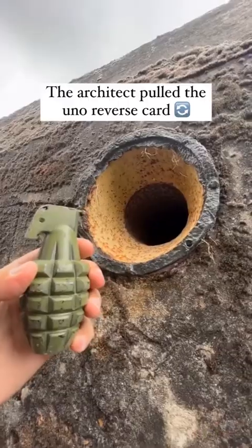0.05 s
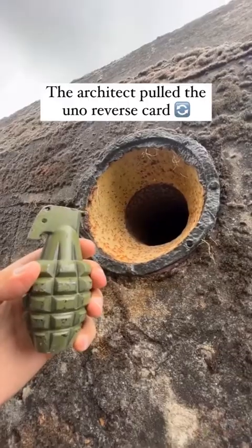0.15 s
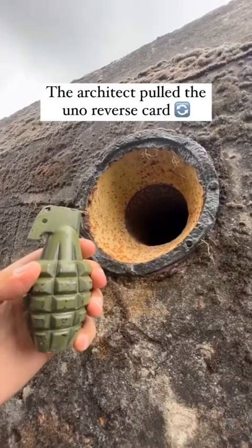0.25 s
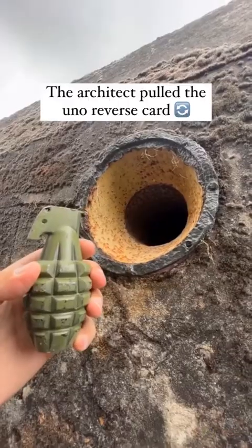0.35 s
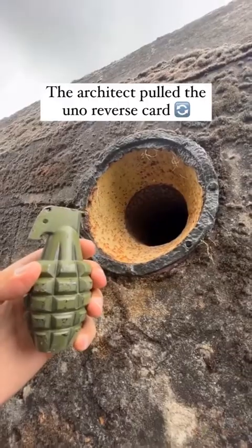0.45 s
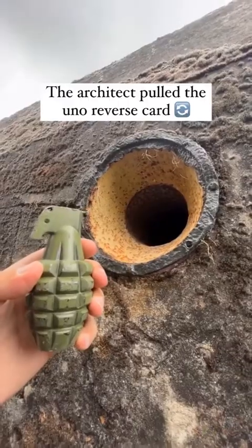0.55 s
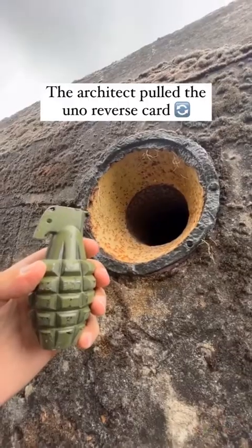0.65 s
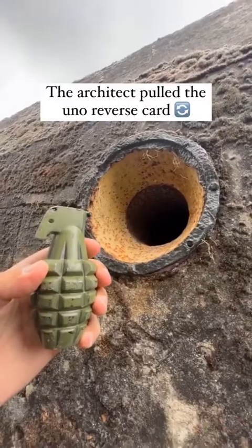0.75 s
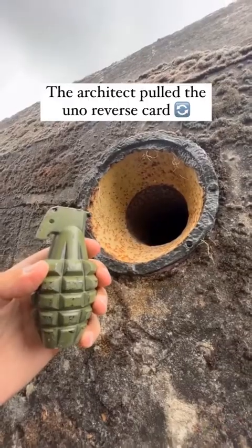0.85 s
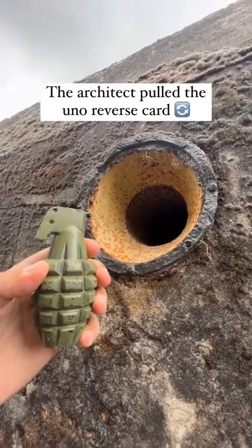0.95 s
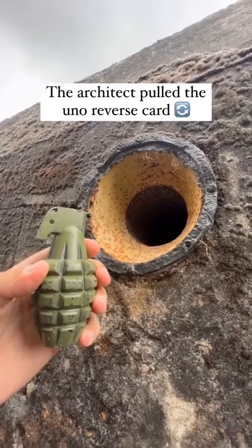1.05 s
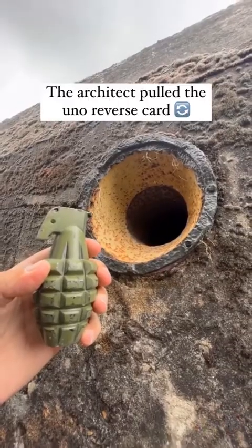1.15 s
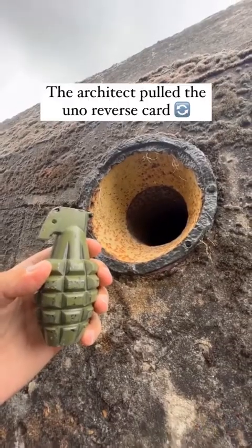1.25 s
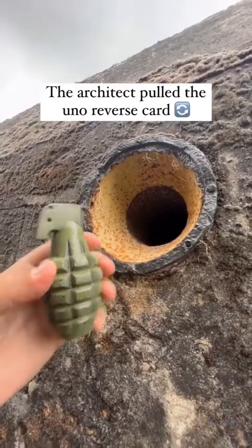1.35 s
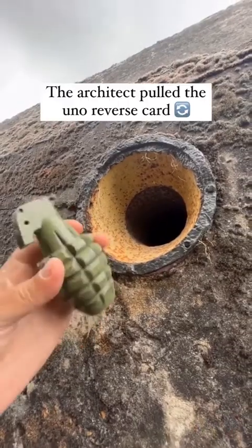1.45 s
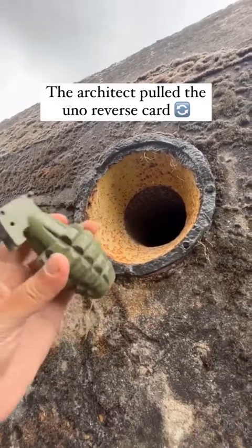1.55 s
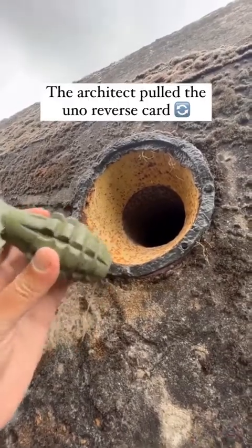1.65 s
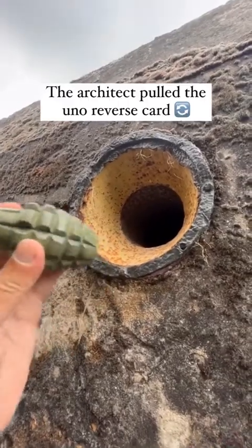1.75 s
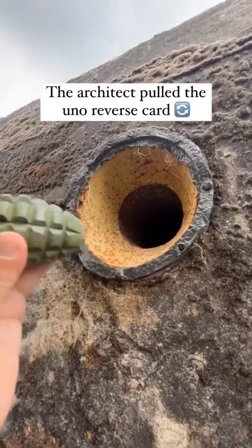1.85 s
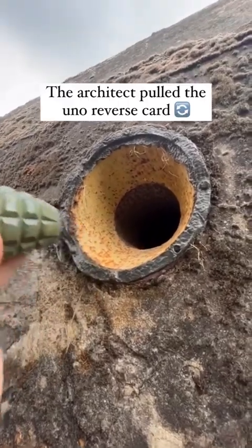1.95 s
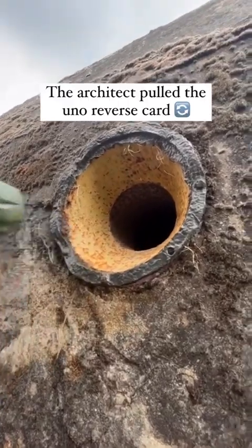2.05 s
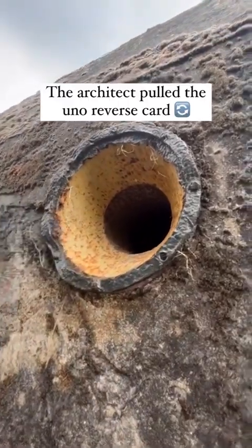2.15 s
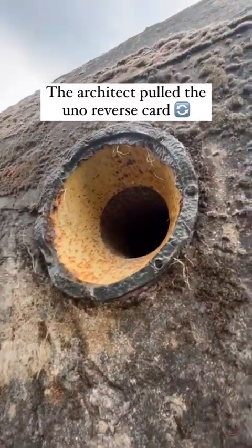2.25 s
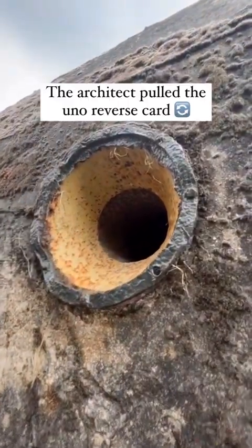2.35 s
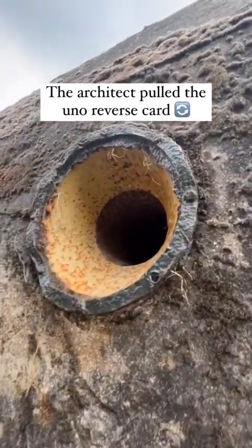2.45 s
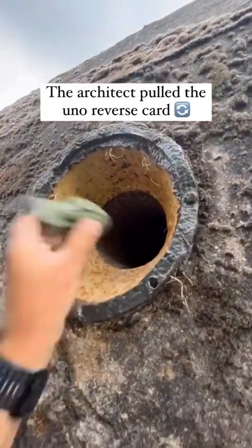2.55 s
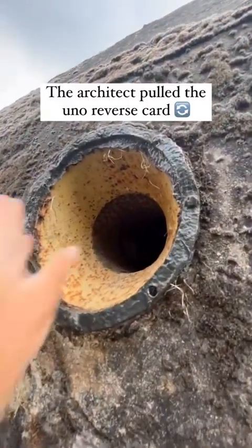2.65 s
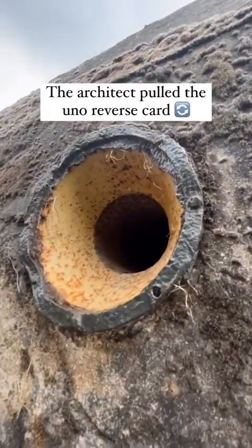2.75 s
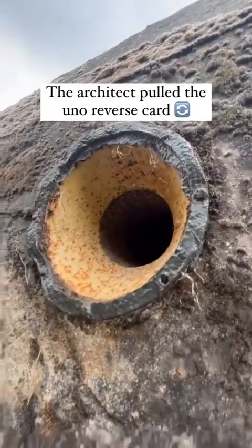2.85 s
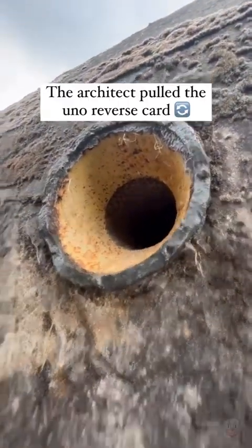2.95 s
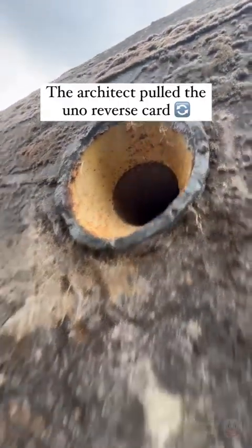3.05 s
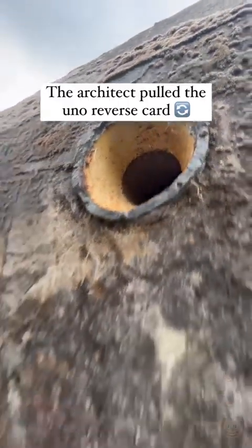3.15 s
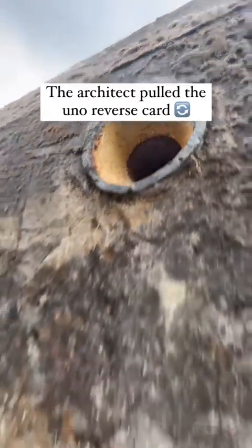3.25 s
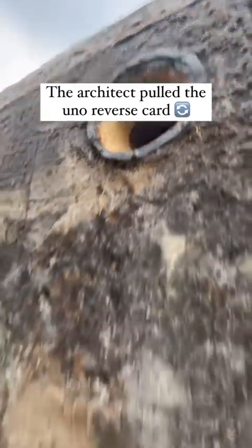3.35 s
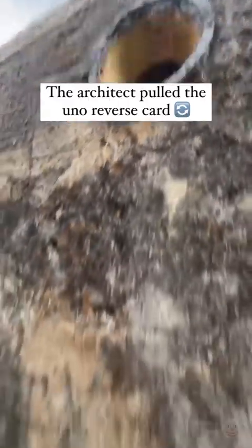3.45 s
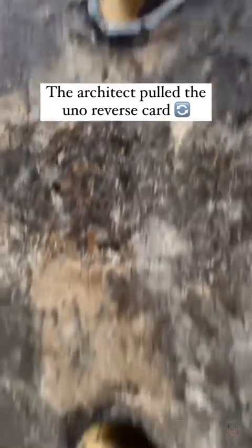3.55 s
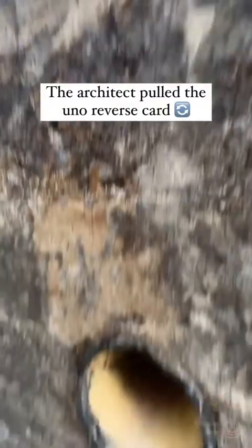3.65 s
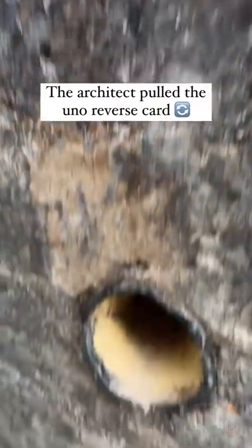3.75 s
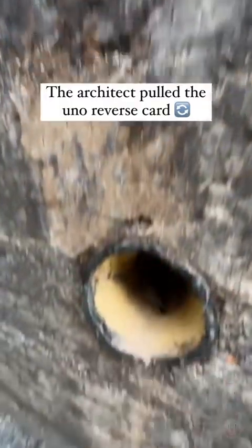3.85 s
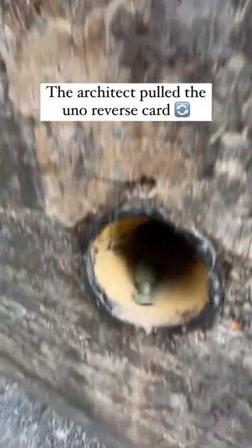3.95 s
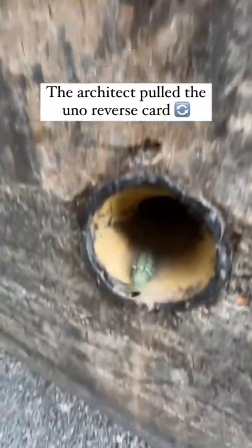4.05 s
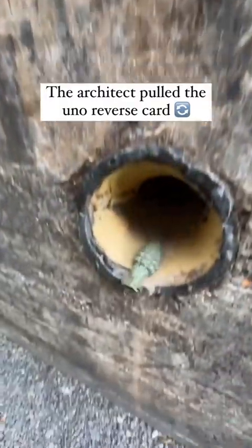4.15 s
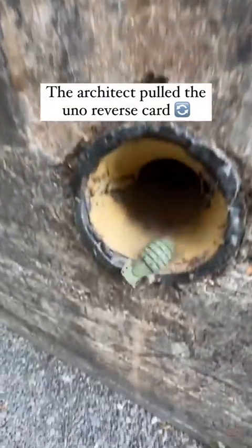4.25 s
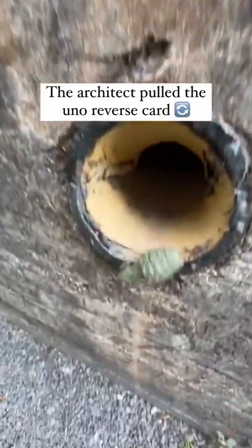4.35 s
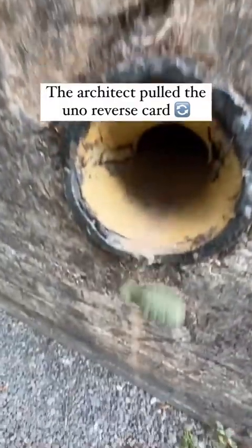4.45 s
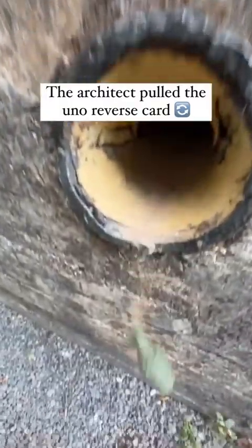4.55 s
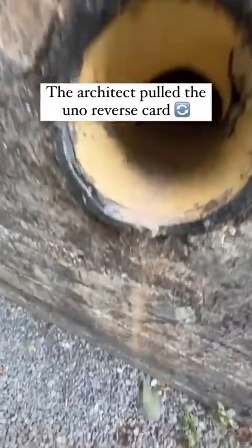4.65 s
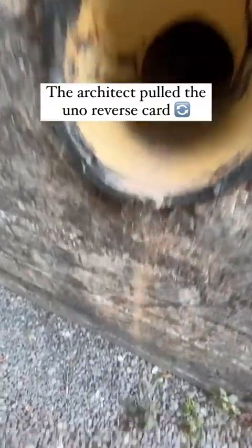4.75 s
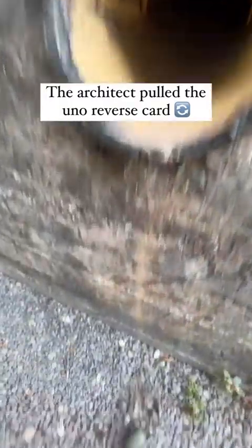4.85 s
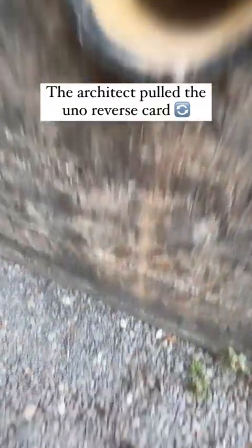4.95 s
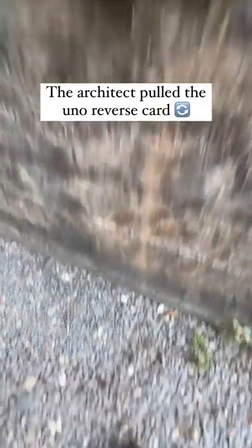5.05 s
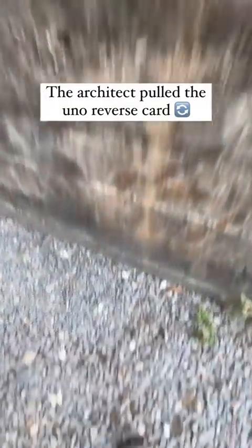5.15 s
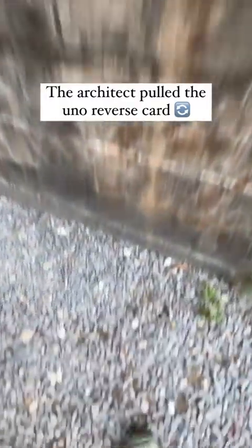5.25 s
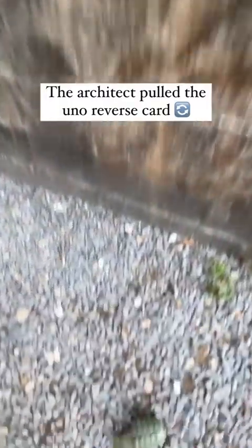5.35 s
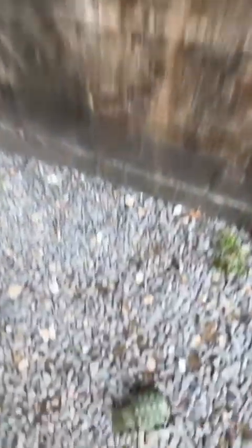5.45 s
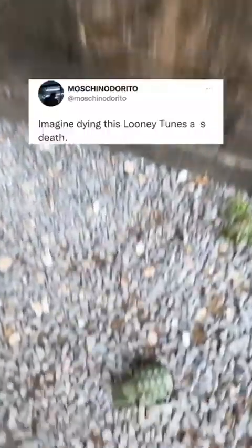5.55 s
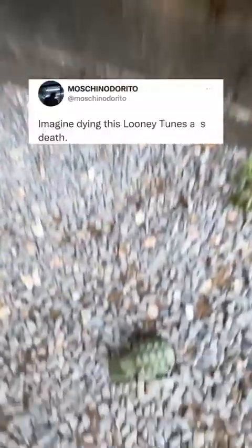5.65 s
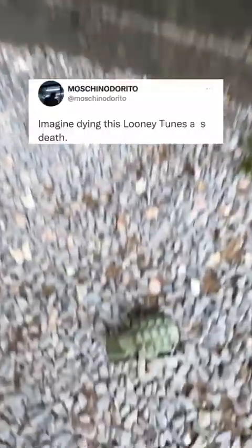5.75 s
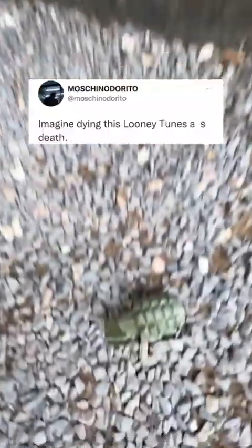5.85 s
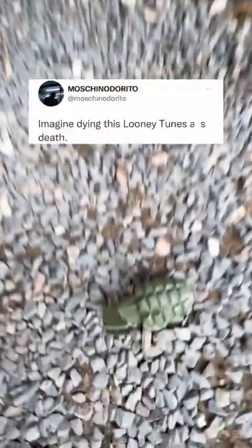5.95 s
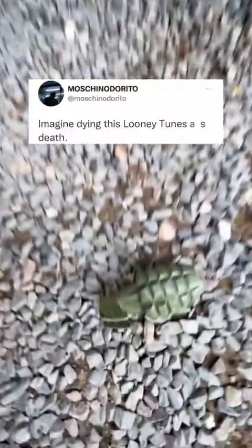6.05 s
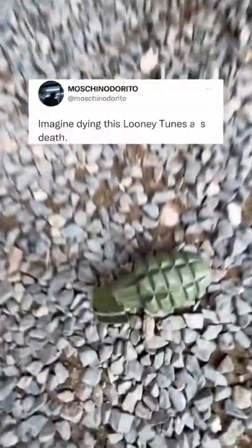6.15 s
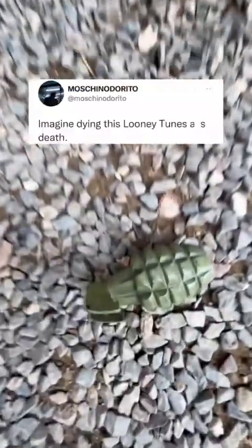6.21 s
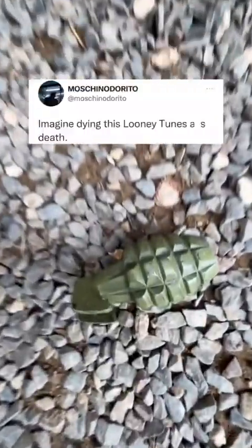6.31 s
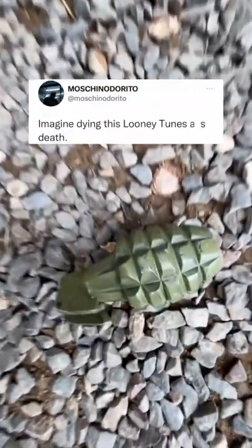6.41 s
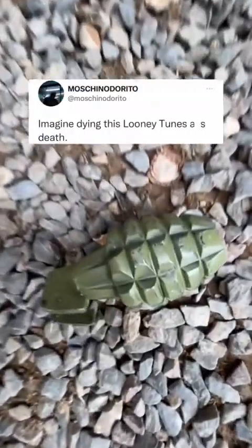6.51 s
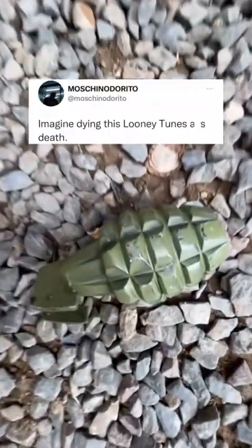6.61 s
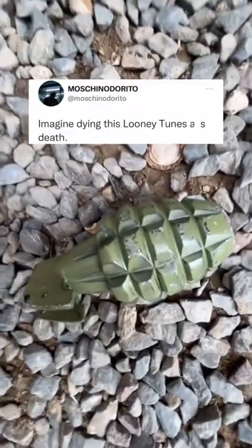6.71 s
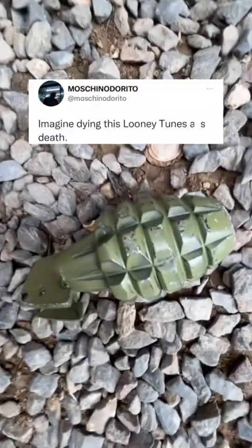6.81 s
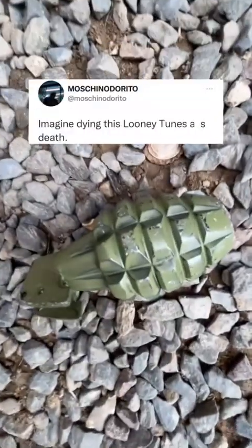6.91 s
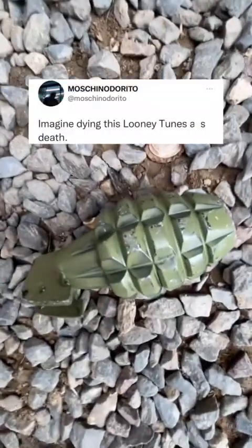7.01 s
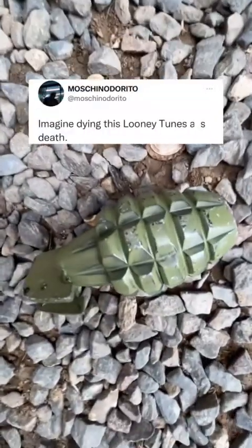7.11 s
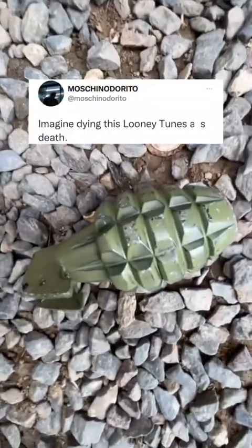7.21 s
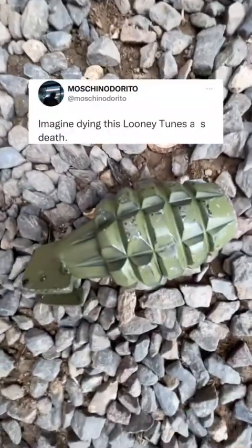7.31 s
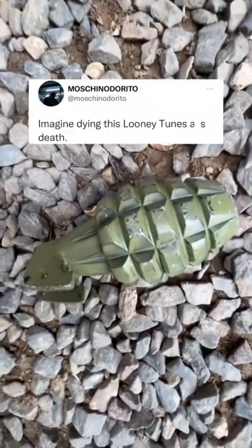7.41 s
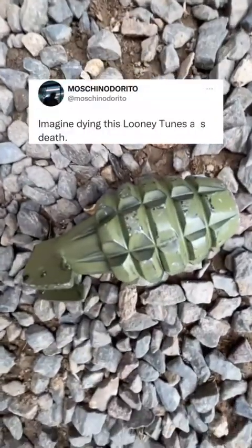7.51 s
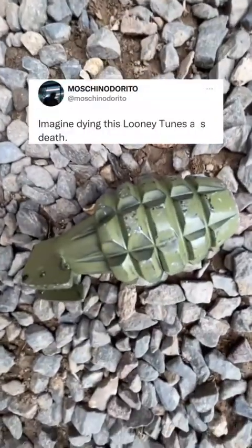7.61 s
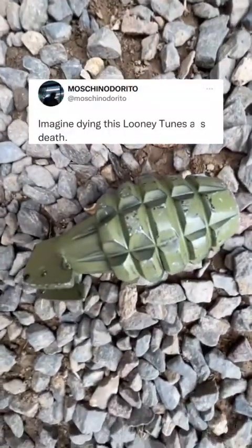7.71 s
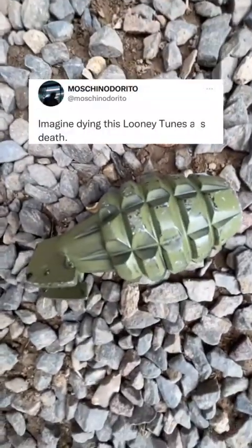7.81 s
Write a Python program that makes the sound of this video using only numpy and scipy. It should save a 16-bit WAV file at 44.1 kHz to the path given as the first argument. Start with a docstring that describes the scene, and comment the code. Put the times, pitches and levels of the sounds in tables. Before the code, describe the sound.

Close outdoor recording with low wind on the microphone. An iron casting is turned in the hand with faint ticks and dull taps, then thrown into a pipe: a hard bang, dense clanging knocks, gritty sliding and thin high ringing. The knocks weaken over a low boom, a brief gap follows, then a sharp crunching landing on gravel, quick small bounces, and only soft wind and quiet air remain.

```python
"""Outdoors, at a concrete wall with a pipe that opens above gravel: a hollow iron casting is turned in the hand,
thrown into the pipe, bangs and slides down it, drops out of the lower mouth and bounces to rest.
Blows are noise knocks and cracks over decaying sine modes; friction is shaped noise that makes the iron sing.
Wind is resonant low noise under a gust curve; quiet coloured air, a pipe boom and a far hum lie beneath."""
import sys
import numpy as np
from scipy import signal
from scipy.fft import rfft, irfft, next_fast_len
from scipy.io import wavfile

SR = 44100
rng = np.random.default_rng(int(sys.argv[2]) if len(sys.argv) > 2 else 0)


def dump(signal):
    """Clip the signal to [-1, 1] and save it as 16-bit WAV at the path in sys.argv[1]."""
    limited = np.clip(np.atleast_2d(signal).T, -1, 1)
    pcm = np.round(limited * 32767).astype(np.int16)
    wavfile.write(sys.argv[1], SR, pcm)


N = 347194

# Far outdoor air: (pitch_hz, density_db)
AIR_SPECTRUM = [(59, -23.5), (100, -6), (161, -6), (220, -12.5), (313, -13.5), (354, -13.5), (525, -13),
                (571, -21.5), (646, -20), (1480, -28), (1790, -35), (3610, -37.5), (14200, -52)]
AIR_DB = -63
# Wind on the microphone before and after the pipe boom, each: (start_s, level_db)
WIND_SPELLS = [
    [(0.0, -48.5), (0.76, -68), (0.89, -53.5), (0.95, -63), (1.67, -63), (2.01, -46), (2.08, -63),
     (2.15, -38), (2.39, -49.5), (3.09, -53), (3.22, -37), (3.38, -50.5), (3.8, -32.5)],
    [(4.76, -37.5), (4.92, -40), (5.34, -43.5), (5.48, -27), (5.63, -45.5), (5.69, -34.5), (5.74, -53.5),
     (5.91, -37.5), (5.94, -51), (6.47, -47), (6.8, -56.5), (7.37, -46), (7.87, -50)],
]
# Soft resonances of the wind: (pitch_hz, width_hz per filter pass, level_db)
WIND_MODES = [(48.5, 15, -5.5), (63, 31, 3), (118, 60, -11.5)]
UNDER_BOOM_DB = -55   # wind level assumed under the pipe boom
BUFFET_DB, BUFFET_RATE_HZ = 3, 3   # random buffeting: spread and fastest rate

# Ribbed iron over fingers, pipe wall and stones: (start_s, length_s, level_db, favoured_pitch_hz, singing_db)
SLIDE_STROKES = [(1.359, 0.084, -68, 6400, 4), (1.515, 0.2, -87, 6000, 37), (1.568, 0.18, -76, 2600, 6),
                 (1.67, 0.16, -83, 4730, 23), (1.769, 0.21, -75, 7050, 25), (1.82, 0.069, -70.5, 2090, 5),
                 (1.958, 0.094, -76, 1450, 0), (2.096, 0.1, -67.5, 7500, 37.5),
                 (2.27, 0.098, -75.5, 7240, 22), (2.433, 0.089, -69, 4930, 20),
                 (2.528, 0.08, -60.5, 6360, 10), (3.235, 0.1, -29.5, 4200, 5.5),
                 (3.238, 0.068, -22, 6400, 11), (4.792, 0.059, -23.5, 6500, 27),
                 (4.848, 0.093, -46, 10770, 24.5), (5.098, 0.13, -54, 9600, 0),
                 (5.265, 0.026, -45.5, 11270, 2), (5.496, 0.04, -54.5, 6360, 19.5)]
# Hiss of those strokes: (pitch_hz, density_db)
SLIDE_SPECTRUM = [(1470, -13.5), (2500, -4), (5210, -17.5), (6970, -15.5), (12400, -2), (13200, -8),
                  (14200, -32.5)]
# Small taps in the hand: (start_s, level_db, colour_hz)
HAND_TAPS = [(1.596, -48, 1950), (1.662, -54.5, 1820), (2.04, -61, 1480), (2.133, -47, 1940),
             (2.22, -44.5, 740), (2.273, -34.5, 600), (2.444, -39, 530), (2.499, -38.5, 590),
             (2.569, -31.5, 553)]
# Rustle of the throw; slide along the pipe wall; stones scatter until about 5.7 s, then faint dull noise fades.
# Each: (start_s, grit_db, rumble_db)
RUBBING_SPELLS = [
    [(1.8, -106, -77.5), (2.16, -80, -64.5), (2.44, -86, -66.5), (2.59, -74, -54.5), (2.67, -65, -50)],
    [(2.68, -38.5, -33.5), (2.87, -35, -40.5), (3.03, -45.5, -37.5), (3.16, -43, -42), (3.27, -35, -30),
     (3.45, -34, -30.5), (3.77, -43, -45.5), (3.93, -47, -47.5), (4.05, -43, -40), (4.22, -60, -55),
     (4.39, -101.5, -41), (4.46, -100, -59), (4.57, -97, -68), (4.75, -95.5, -78.5)],
    [(4.775, -49, -21), (4.83, -36, -39.5), (4.94, -32, -45), (5.075, -43.5, -51.5), (5.3, -64.5, -57.5),
     (5.72, -75, -65.5), (5.9, -108, -67.5), (6.7, -115, -81.5)],
]
# Bright grains of the rubbing: (pitch_hz, density_db)
GRIT_SPECTRUM = [(1760, -52.5), (3000, -19), (5390, -4), (6340, -0.5), (8010, -5), (10900, -2),
                 (12500, -17), (14200, -30)]
# Dull part of the rubbing: (pitch_hz, density_db)
RUMBLE_SPECTRUM = [(88, -44.5), (150, 4.5), (2200, -0.5), (3290, -8.5), (3830, -12.5), (4830, -4.5),
                   (5220, -13.5), (6000, -14.5), (7800, -33), (13200, -120)]

# Blows on the pipe wall: (start_s, knock_db, colour_hz, crack_db, low_ring_db, upper_ring_db, favoured_pitch_hz)
PIPE_BLOWS = [(2.673, -2.5, 2510, -13, -17, -8, 7440), (2.767, -19.5, 690, -3.5, -19.5, -11.5, 7130),
              (2.789, -40, 705, -12, -59, -3.5, 6670), (2.847, -7.5, 1850, -33, -15, -8.5, 10000),
              (2.888, -4, 2450, -17.5, -52, -13.5, 7570), (2.908, -10, 2210, -5.5, -17, -21, 9960),
              (2.928, -25, 1250, -40, -28, -36, 6300), (2.977, -9, 2000, -9, -13, -3.5, 8500),
              (2.999, -25, 2150, -7.5, -27, -32, 7400), (3.048, -14.5, 1620, -14.5, -18.5, -13, 9700),
              (3.17, -30, 690, -9, -26, -2, 8550), (3.229, -5, 1390, -11.5, -10.5, -4.5, 6250),
              (3.243, -2, 2170, -1, -22.5, -22.5, 6200), (3.351, -3.5, 2670, 2, -17, -23.5, 9440),
              (3.428, -28, 740, -20, -32, -13.5, 6700), (3.488, -11, 1200, 1.5, -22.5, -15, 6800),
              (3.594, -24.5, 430, -41.5, -39.5, -26.5, 9760), (3.624, -40, 735, -38, -38, -22, 7400),
              (3.675, -18.5, 1130, -23, -38, -23, 6730), (3.728, -26.5, 1030, -27, -32, -22, 6730),
              (3.774, -40, 680, -39, -60, -21, 5980), (3.81, -18, 1230, -22, -43, -10, 5800),
              (3.826, -46, 403, -38, -51, -9, 5940), (3.863, -21.5, 1310, -20, -46, -22, 6630),
              (3.891, -52, 2180, -20.5, -45, -22.5, 6280), (3.952, -13.5, 1580, -14, -33.5, -55, 6300),
              (3.98, -17.5, 3600, -36.5, -62, -22, 8800), (4.01, -20, 3450, -36, -55, -47, 8960),
              (4.031, -16.5, 3330, -26, -57, -39, 9300), (4.082, -29, 2010, -34, -44.5, -38, 9500),
              (4.105, -23, 2130, -43, -37.5, -22, 11930), (4.155, -32.5, 2200, -54.5, -39, -30, 10100),
              (4.183, -26, 2020, -50, -42, -49, 10600), (4.24, -36, 2200, -37.5, -47.5, -38, 5900),
              (4.282, -42, 1900, -48, -59.5, -58, 6300), (4.319, -22, 1430, -42, -58, -34, 6250),
              (4.376, -24.5, 1296, -37, -58.5, -60.5, 6700), (4.562, -59.5, 1940, -63, -75, -70.5, 6400)]
# Bounces on the gravel: (start_s, thud_db, colour_hz, crack_db, low_ring_db, upper_ring_db, favoured_pitch_hz)
GRAVEL_BLOWS = [(4.771, -12.5, 614, 5.5, -37, -26, 6400), (4.8, -26, 626, -14.5, -48.5, -34, 6500),
                (4.851, -16, 436, -9, -29, -11.5, 10400), (4.902, -29, 390, -24, -40, -37, 6480),
                (4.943, -28, 395, -8, -55, -29, 6270), (4.981, -20, 378, -6, -41, -9.5, 6180),
                (5.037, -32, 379, -13, -38, -23, 9050), (5.058, -32, 386, -23, -43, -12, 6280),
                (5.104, -35, 390, -18.5, -41, -21, 8830), (5.191, -36, 375, -30, -60, -36, 6260),
                (5.277, -42.5, 376, -23.5, -40, -19.5, 6600), (5.385, -55, 355, -33.5, -62.5, -40.5, 6440),
                (5.463, -66, 350, -56, -55, -49, 6360), (5.515, -68.5, 348, -34, -69, -36, 6520),
                (5.57, -67, 348, -47, -57.5, -43, 6300), (5.607, -54, 347, -27, -53.5, -36.5, 8066),
                (5.637, -60, 361, -36.5, -67, -40, 6370)]
# Ringing lines of the iron, the first pair its low ring: (pitch_hz, level_db, t60_s)
CASTING_MODES = [(4712, -5, .75), (4762, -6, 0.3), (6262, -7, .1), (6400, -7, .08), (6490, -8, .09),
                 (7031, -7, .17), (8066, -6, .22), (8995, -11, .13), (9424, -3, .25), (9500, -8, .15),
                 (10163, -9, .08), (10900, -5, .25), (10965, -5, .25), (11542, -11, .25), (12920, -15, .25)]
LOW_KEPT, UPPER_KEPT = 0.7, 0.4   # share of the ring's amplitude that survives each new contact
FAVOUR_DB_PER_OCTAVE, FAVOUR_MOST_DB = 89, 21   # loss of an upper mode away from the favoured pitch
DETUNE = .0018   # small random relative pitch spread from blow to blow, which widens the lines
CONTACT_CHANGE_S = 0.00061   # time constant with which a blow takes over a ringing line
# Resonances of the pipe wall: (pitch_hz, width_hz, level_db)
PIPE_MODES = [(172, 40, 18), (370, 60, 11), (690, 37, 14), (1000, 200, 3), (1311, 28, 11), (1558, 25, 6),
              (2150, 32, 9), (2495, 30, 7), (2780, 35, 7), (2932, 35, 7), (3965, 35, 8)]
WALL_SPREAD_DB = 3.5   # each knock excites each wall resonance by a chance amount
CONTACT_T60_S, PIPE_ECHO_T60_S, PIPE_ECHO_DB = .018, .17, -10   # sharp contact, then the pipe's tail
BODY_HZ, BODY_DB = 450, -19.5   # low body under each knock
PIPE_DULLS_HZ = 11000   # the pipe swallows the top of the cracks

# Boom of the pipe's air column: (start_s, attack_s, hold_s, release_s to -60 dB, pitch_hz, level_db)
PIPE_BOOM = (3.72, .06, .62, 1.9, 72.3, -41)
# Far hum that comes up: (start_s, attack_s, hold_s, release_s to -60 dB, pitch_hz, level_db)
FAR_HUM = (4, 1.97, 0.7, 7, 354, -66.5)
# Modes of the gravel bed: (pitch_hz, level_db, t60_s)
GRAVEL_MODES = [(148.6, 0, 0.08), (264, -7, 0.11), (400, -7, 0.22), (640, -9.5, 0.27)]
CRUNCH_DB, CRUNCH_T60_S = -16, 0.083   # tail of shifting stones

# The recorder's gain control: onset, fall of its held peak, share of the excess taken off
LIMIT_DB, HELD_FALL_DB_PER_S, SQUEEZE = -3.5, 143.5, 0.42
TOP_CUT_HZ = 14500   # from here up the output is at least 55 dB down


def from_db(db):
    """Decibels to gain."""
    return 10 ** (np.asarray(db) / 20)


def rms_one(x):
    """Scale to unit rms."""
    return x / np.sqrt(np.mean(x ** 2) + 1e-20)


def in_time(rows, outside=None):
    """Draw the columns of a curve table as one value per sample."""
    s, *columns = np.transpose(rows)
    return [np.interp(np.arange(N) / SR, s, c, outside, outside) for c in columns]


def coloured(x, spectrum):
    """Shape a signal's spectrum by (pitch_hz, density_db) points, at unit rms."""
    size = next_fast_len(N)
    log_hz = np.log(np.arange(size // 2 + 1) * SR / size + 1)
    point_hz, point_db = np.transpose(spectrum)
    gain = from_db(np.interp(log_hz, np.log(point_hz), point_db))
    return rms_one(irfft(rfft(x, size) * gain, size)[:N])


def resonance(x, hz, width_hz):
    """Two-pole band-pass with a gain of about 1 on its peak."""
    r = np.exp(-np.pi * width_hz / SR)
    zeros = [(1 - r * r) / 2, 0, (r * r - 1) / 2]
    poles = [1, -2 * r * np.cos(2 * np.pi * hz / SR), r * r]
    return signal.lfilter(zeros, poles, x)


def wobble(rate_hz):
    """Slow random drift with spread 1: low-passed noise drawn on a coarse grid."""
    low_pass = signal.butter(2, rate_hz, fs=SR / 32, output="sos")
    coarse = signal.sosfilt(low_pass, rng.standard_normal(N // 32 + 2))
    return np.interp(np.arange(N) / 32, np.arange(len(coarse)), rms_one(coarse))


def add(out, s, x):
    """Mix a short sound in at a time."""
    i = round(s * SR)
    out[i:i + len(x)] += x[:N - i]


def burst(t60, attack_s):
    """Noise with a quick rise that dies away."""
    t = np.arange(SR // 3) / SR
    envelope = (1 - np.exp(-t / attack_s)) * from_db(-60 * t / max(t60, .003))
    return rng.standard_normal(len(t)) * envelope


def knock(hz, t60, tail_db):
    """A sharp contact and its echoing tail, coloured by where it lands; the contact alone peaks at 1."""
    sharp = resonance(resonance(burst(CONTACT_T60_S, 0.0004), hz, 0.9 * hz), hz, 0.9 * hz)
    tail = resonance(resonance(burst(t60, 0.0018), hz, 1.2 * hz), hz, 2.0 * hz)
    return sharp / np.abs(sharp).max() + from_db(tail_db) * tail / np.abs(tail).max()


def crack(t60, low_hz, tail_db):
    """The bright edge of a contact: high-passed noise with a short tail, peaking at 1."""
    x = burst(0.01, 0.0009) + from_db(tail_db) * burst(t60, 0.0049)
    x = signal.sosfilt(signal.butter(2, low_hz, "high", fs=SR, output="sos"), x)
    return x / np.abs(x).max()


def off_pitch(hz, favoured_hz, db_per_octave, most_db):
    """A mode far from the pitch that a contact favours is excited less."""
    octaves = np.abs(np.log2(hz / np.asarray(favoured_hz)))
    return -np.minimum(db_per_octave * octaves, most_db)


def ringing(times, levels_db, modes, kept, spread_db, flutter_db):
    """Each blow damps what rings and strikes every mode anew, while each line's level flutters."""
    out = np.zeros(N)
    at = [round(s * SR) for s in times]
    ends = at[1:] + [min(N, at[-1] + SR)]
    strengths, bends = rng.standard_normal((2, len(at), len(modes)))
    for k, (hz, db, t60) in enumerate(modes):
        before, line = 0, np.zeros(N)   # before: complex amplitude on arrival of a blow
        for i, end, level_db, chance, bend in zip(at, ends, levels_db(hz), strengths[:, k], bends[:, k]):
            turn = 2j * np.pi * hz * (1 + DETUNE * bend) / SR - np.log(1000) / (t60 * SR)
            struck = from_db(level_db + db + spread_db * chance)
            # energies add, the phase jumps
            strength = np.hypot(kept * abs(before), struck)
            after = strength * np.exp(1j * (np.angle(before) + chance))
            steps = np.arange(end - i)
            swing = after + (before - after) * np.exp(-steps / (CONTACT_CHANGE_S * SR))
            line[i:end] = (swing * np.exp(turn * steps)).imag
            before = swing[-1] * np.exp(turn * (end - i))
        out += line * from_db(flutter_db * wobble(38))
    return out


def tone(shape, waver_hz, waver):
    """A sine that swells, holds and dies away, its level wavering."""
    start, attack, hold, release, hz, db = shape
    t = np.arange(N) / SR - start
    fade_db = -60 * np.maximum(t - attack - hold, 0) / release
    swell = np.clip(t / attack, 0, 1) * from_db(db + fade_db)
    sine = np.sqrt(2) * np.sin(2 * np.pi * hz * t)   # unit rms
    return swell * (1 + waver * wobble(waver_hz)) * sine


def distant_air():
    """Steady noise in the colour of quiet outdoor air."""
    return from_db(AIR_DB) * coloured(rng.standard_normal(N), AIR_SPECTRUM)


def wind():
    """Low noise in a few soft resonances under the gust curve, at an assumed level under the pipe boom."""
    lumps = np.zeros(N)
    for hz, width_hz, db in WIND_MODES:
        once = resonance(rng.standard_normal(N), hz, width_hz)
        lumps += from_db(db) * rms_one(resonance(once, hz, width_hz))
    under_boom = [(3.86, UNDER_BOOM_DB), (4.7, UNDER_BOOM_DB)]
    gusts_db = in_time(WIND_SPELLS[0] + under_boom + WIND_SPELLS[1])[0]
    return from_db(gusts_db + BUFFET_DB * wobble(BUFFET_RATE_HZ)) * rms_one(lumps)


def slides():
    """Brief strokes of friction noise, each making some modes of the casting sing."""
    out = np.zeros(N)
    hiss = coloured(rng.standard_normal(N), SLIDE_SPECTRUM) * from_db(1.2 * wobble(60))
    for s, length_s, db, favoured_hz, sing_db in SLIDE_STROKES:
        stroke = np.zeros(SR // 2)   # room for the singing to die away
        length = round(length_s * SR)
        stroke[:length] = signal.windows.tukey(length, .5)
        x = from_db(db) * stroke * hiss[round(s * SR):][:len(stroke)]
        sung = sum(from_db(off_pitch(hz, favoured_hz, 50, 40)) * resonance(x, hz, 46)
                   for hz, mode_db, t60 in CASTING_MODES)
        band = resonance(x, favoured_hz, 0.19 * favoured_hz)
        add(out, s, 0.13 * x + 3.5 * band + from_db(sing_db) * sung)
    return out


def taps():
    """Dull little contacts, as noise knocks, while the casting is turned."""
    out = np.zeros(N)
    for s, level_db, hz in HAND_TAPS:
        add(out, s, from_db(level_db) * knock(hz, 0.33, tail_db=-9.0))
    return out


def rubbing(per_s, size_db, sing_db, clump_db):
    """Uneven bright grains in clumps set the casting singing, over a dull rumble that is lumpier when loud."""
    grit_db, rumble_db = np.max([in_time(rows, -120) for rows in RUBBING_SPELLS], axis=0)
    grains = (rng.random(N) < per_s / SR) * rng.standard_normal(N)
    grains = grains * from_db(size_db * np.minimum(rng.exponential(1, N), 4))
    grit = from_db(grit_db + clump_db * wobble(40)) * coloured(grains, GRIT_SPECTRUM)
    sung = sum(from_db(db) * resonance(grit, hz, 40) for hz, db, t60 in CASTING_MODES)
    lumps_db = 3 * np.clip((rumble_db + 70) / 25, 0, 1)
    rumble = coloured(rng.standard_normal(N), RUMBLE_SPECTRUM)
    rumble = from_db(rumble_db + lumps_db * wobble(30)) * rumble
    return grit + from_db(sing_db) * sung + rumble


def casting():
    """The iron shell rings in thin high lines; the spot that is hit decides which of them lead."""
    blows = np.array(PIPE_BLOWS + GRAVEL_BLOWS)
    s, low_db, upper_db, favoured_hz = blows[:, [0, 4, 5, 6]].T

    def upper_levels(hz):
        """Ring level of one upper mode at every blow."""
        return upper_db + off_pitch(hz, favoured_hz, FAVOUR_DB_PER_OCTAVE, FAVOUR_MOST_DB)

    low = ringing(s, lambda hz: low_db, CASTING_MODES[:2], LOW_KEPT, spread_db=1.5, flutter_db=2.0)
    upper = ringing(s, upper_levels, CASTING_MODES[2:], UPPER_KEPT, spread_db=2.0, flutter_db=3.0)
    return low + upper


def pipe():
    """Knocks that set the pipe wall resonating, and their bright cracks with the top dulled."""
    out, cracks = np.zeros((2, N))
    shares = from_db(WALL_SPREAD_DB * rng.standard_normal((len(PIPE_BLOWS), len(PIPE_MODES))))
    for (s, knock_db, hz, crack_db, *rings), share in zip(PIPE_BLOWS, shares):
        body = from_db(BODY_DB) * knock(BODY_HZ, .05, -10)
        hit = from_db(knock_db) * (knock(hz, PIPE_ECHO_T60_S, PIPE_ECHO_DB) + body)
        wall = sum(k * from_db(db) * resonance(hit, mode_hz, width_hz)
                   for k, (mode_hz, width_hz, db) in zip(share, PIPE_MODES))
        add(out, s, hit + wall)
        add(cracks, s, from_db(crack_db) * crack(0.054, 4300, tail_db=-6.5))
    dulling = signal.butter(2, PIPE_DULLS_HZ, fs=SR, output="sos")
    return out + signal.sosfilt(dulling, cracks + 1e-18)


def pipe_boom():
    """The air column of the pipe booms as one low sine."""
    return tone(PIPE_BOOM, 12, waver=0.094)


def far_hum():
    """A far hum comes up as one wavering sine."""
    return tone(FAR_HUM, 6, waver=.5)


def gravel():
    """Thuds and stone cracks; the bed's lowest mode answers every thud, the others favour its colour."""
    s, thud_db, colour_hz = np.transpose(GRAVEL_BLOWS)[:3]

    def bed_levels(hz):
        """Level of one bed mode at every bounce."""
        return thud_db + (hz > GRAVEL_MODES[0][0]) * off_pitch(hz, colour_hz, 13, 42)

    # the bed answers 4 ms after each contact
    out = ringing(s + .004, bed_levels, GRAVEL_MODES, kept=.5, spread_db=1.2, flutter_db=1.5)
    for start_s, level_db, hz, crack_db, *rings in GRAVEL_BLOWS:
        thud = from_db(level_db) * knock(hz, 0.1233, tail_db=-14.5)
        stones = from_db(crack_db) * crack(CRUNCH_T60_S, 3270, CRUNCH_DB)
        add(out, start_s, thud + stones)
    return out


def scene():
    """All sources, summed in one channel."""
    background = distant_air() + wind() + pipe_boom() + far_hum()
    friction = slides() + rubbing(5100, size_db=4.5, sing_db=0.5, clump_db=2.5)
    blows = taps() + casting() + pipe() + gravel()
    return (background + friction + blows)[None]


def record(dry):
    """Gain control ducks after loud peaks and recovers; peaks are rounded, the top is cut."""
    ramp = HELD_FALL_DB_PER_S * np.arange(N) / SR
    peak_db = 20 * np.log10(np.abs(dry) + 1e-6)
    held_db = np.maximum.accumulate(peak_db + ramp, axis=1) - ramp
    # smoothed over about 4 ms
    duck_db = signal.lfilter([.006], [1, -.994], SQUEEZE * np.maximum(held_db - LIMIT_DB, 0))
    level = .95 * np.tanh(dry * from_db(-duck_db) / .95)
    return signal.sosfilt(signal.cheby2(10, 55, TOP_CUT_HZ, fs=SR, output="sos"), level)


dry = scene()
out = record(dry)
dump(out)
```